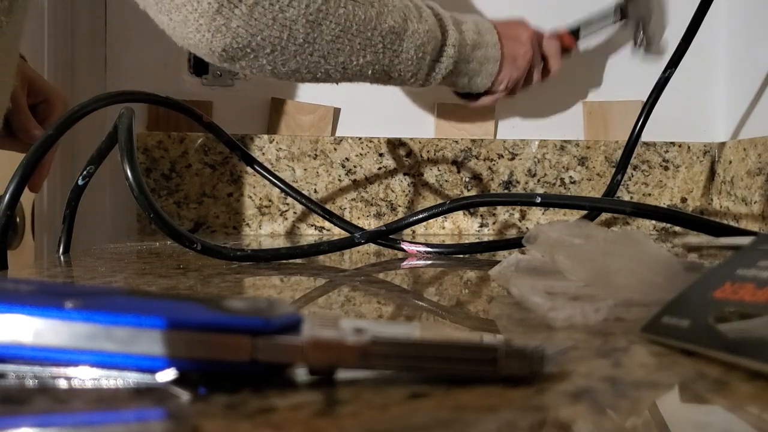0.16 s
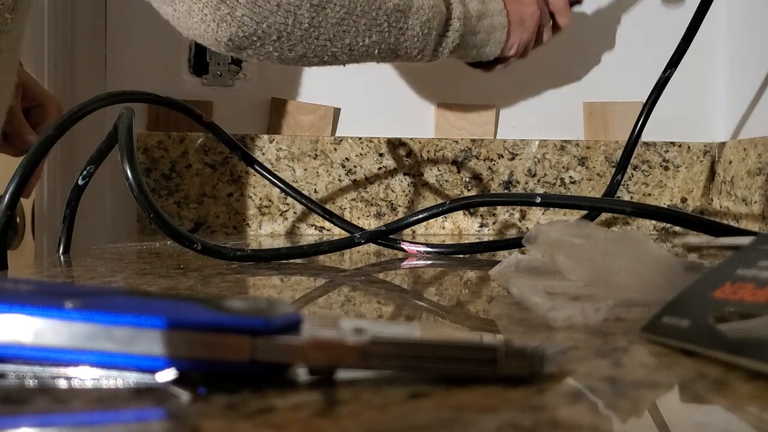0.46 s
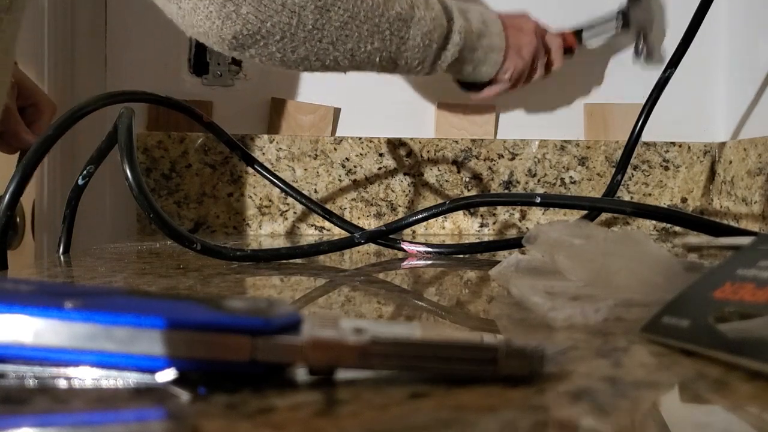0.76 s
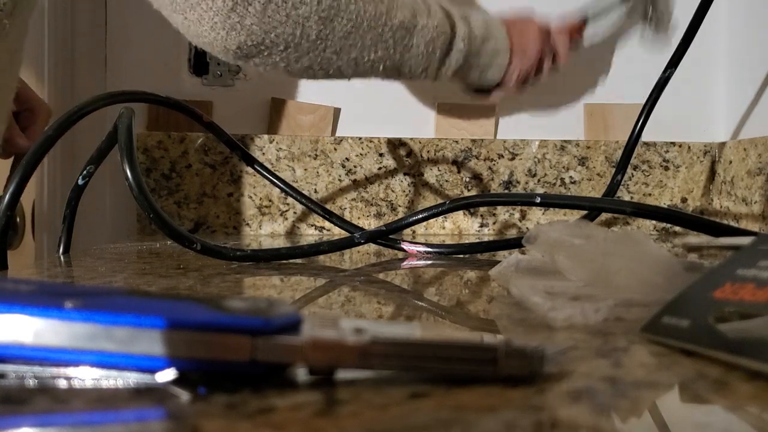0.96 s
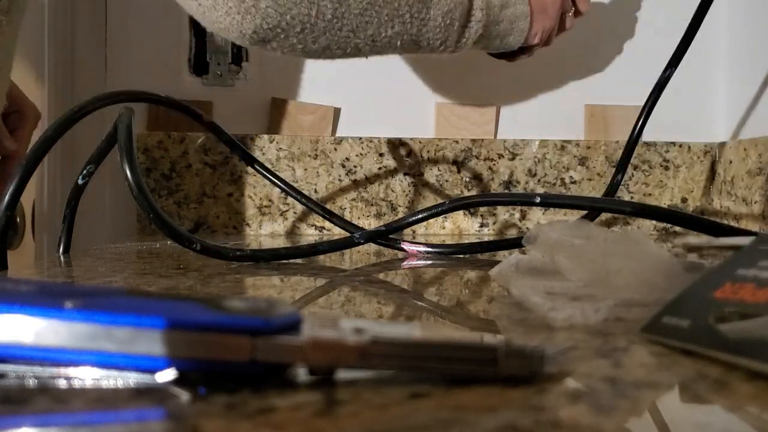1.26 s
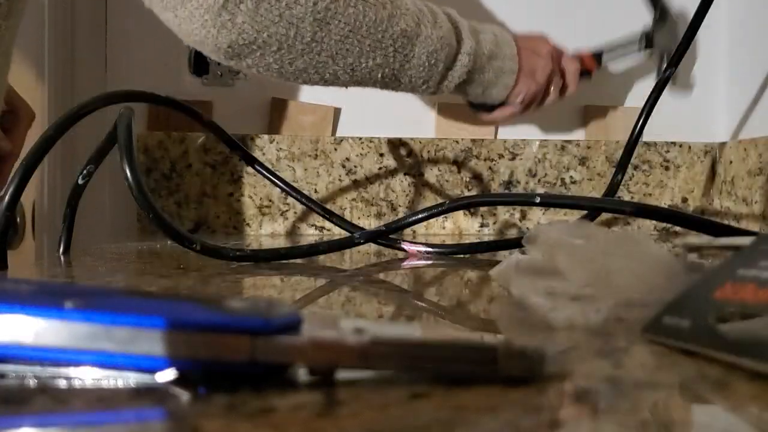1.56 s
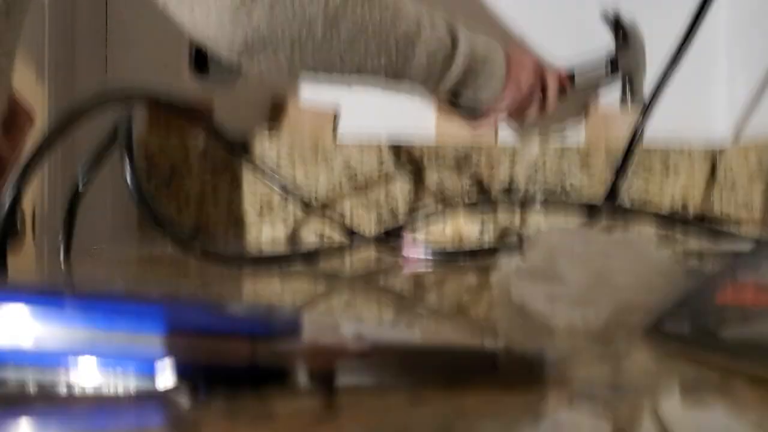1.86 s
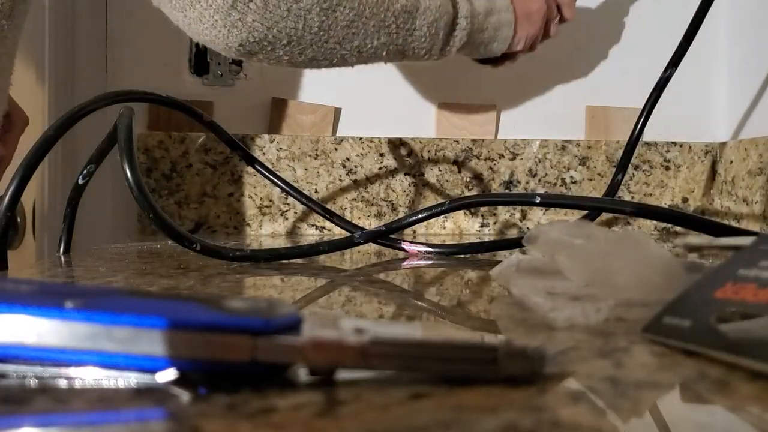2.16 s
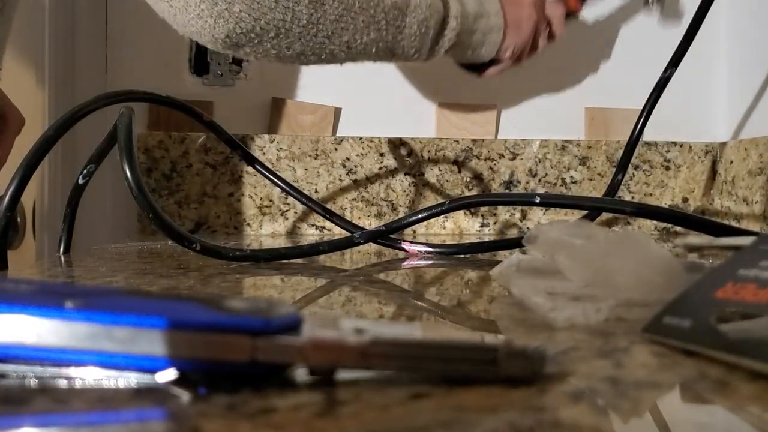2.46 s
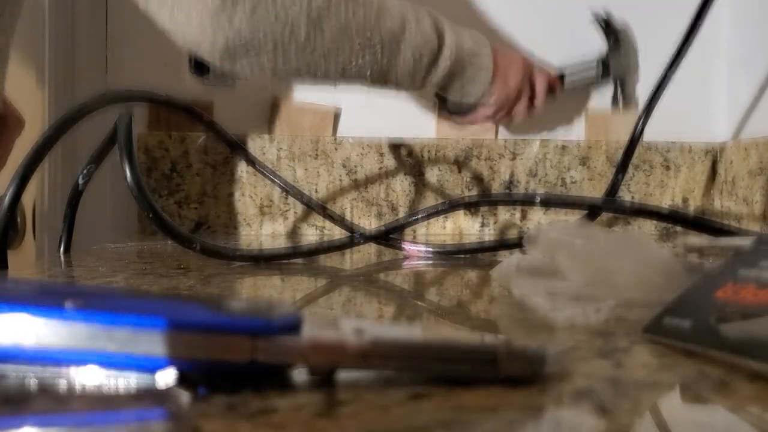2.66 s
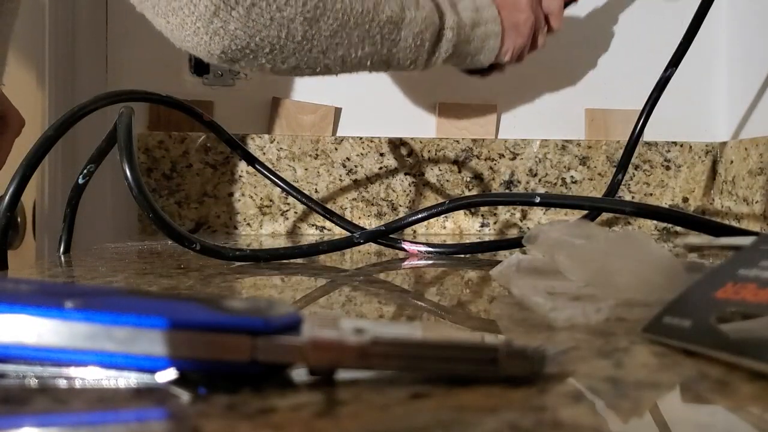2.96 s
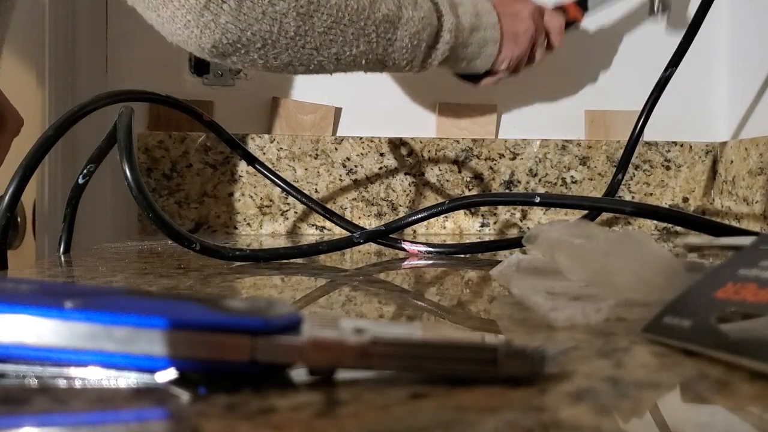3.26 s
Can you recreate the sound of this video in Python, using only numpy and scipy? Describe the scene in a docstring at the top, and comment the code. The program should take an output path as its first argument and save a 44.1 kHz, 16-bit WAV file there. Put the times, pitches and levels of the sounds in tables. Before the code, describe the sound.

Hammer blows crack sharply on a wooden wedge, about every 0.4 seconds, each with a short boom and bright room ring; close stereo phone microphone on a stone counter in a bare, hard room.

```python
"""Sharp hammer blows, each a crack with a brief boom and a ringing room: a claw hammer drives a wooden
wedge between a stone upstand and a wall, close to a phone lying on the stone counter of a bare, hard room.
Each blow comes faintly through the stone first (a short sine), then through the air as a noise burst.
Damped sines make the boom of wall panel and cabinet; fading noise makes the echoes. A light knock follows
one blow, and a faint room tone (steady noise) lies under it all. The right microphone is a little nearer."""
import sys
import numpy as np
from scipy import signal
from scipy.fft import rfft, irfft
from scipy.io import wavfile

SR = 44100
rng = np.random.default_rng(int(sys.argv[2]) if len(sys.argv) > 2 else 0)


def invert_db(x):
    """Field ratio 10**(x/20) for x, a level in decibels (scalar or array-like)."""
    u = np.asarray(x, float) / 20
    return 10 ** u


def put_to_file(sound):
    """Save the sound as 16-bit audio at rate SR, in the file named by the first command-line argument."""
    columns = np.atleast_2d(sound).T  # one column per channel
    safe = np.clip(columns, -1, 1)
    whole_steps = np.round(safe * 32767)
    wavfile.write(sys.argv[1], SR, whole_steps.astype(np.int16))


N = 149940  # samples, 3.4 s
LEAD_S, RING_S = .2, .75  # time computed ahead of the start; length of each blow
STONE_LEAD_S = .0018  # the sound in the stone arrives this much before the sound in the air
LEFT_LAG_S = .00016  # near sounds reach the left microphone later
ATTACK_S = 0.00011  # time constant of a quick rise


def read(table, hz):
    """Second column of a table, joined by straight lines on a log-frequency axis."""
    table = np.array(table, float)
    return np.interp(np.log(hz + 1), np.log(table[:, 0]), table[:, 1])


def decay(t, t60):
    """Exponential loss of energy: down by 60 dB after t60 seconds."""
    return np.exp(-np.log(1000) * t / t60)


def fade(t, t60):
    """A quick rise at time zero, then exponential decay; silent before."""
    t = np.maximum(t, 0)
    return (1 - np.exp(-t / ATTACK_S)) * decay(t, t60)


def coloured(colour, t, like):
    """Spectra of two noise channels, rms 1 together; like(hz) is their left-right correlation."""
    hz = np.fft.rfftfreq(len(t), 1 / SR)
    mid, side = rfft(rng.standard_normal((2, len(t)))) * invert_db(read(colour, hz))
    like = np.clip(like(hz), -1, 1)
    pair = np.sqrt(1 + like) * mid + np.sqrt(1 - like) * side * np.array([[1], [-1]])
    rms = np.sqrt(np.mean(irfft(pair, len(t)) ** 2))
    return pair / rms, hz


def late_left(x):
    """A near source: the same sound on both microphones, the left one later."""
    return np.array([np.roll(x, round(LEFT_LAG_S * SR)), x])


# hammer blows: t/s of the crack, level/dB, treble/dB above the knee, boom/dB (body and near walls),
# further level/dB above the top knee; the first falls before the start, so only its ring is heard
BLOWS = [(-.14, 4, 3.5, 4, -3), (0.2596, -1, 5.5, -2.5, -5.5), (0.6595, -0.5, 6, -3, -5),
         (1.0527, -0.5, 1, -4, -7), (1.4406, 0, -8, -1.5, 7), (1.9033, 0.5, -2.5, -2.5, 4),
         (2.318, -0.5, -2, -2, 9.5), (2.7117, 0.5, -2.5, -2.5, 5.5), (3.0994, 0.5, -1.5, -1.5, 2)]
OWN_SHARE = .35  # share of each blow's noise power that is its own, as the wedge sinks and the arm moves


def hammer_blows():
    """Every blow excites the same wedge, wall and room, with part of its echo pattern its own."""
    t = np.arange(int(RING_S * SR)) / SR
    lead = int(LEAD_S * SR)
    out = np.zeros((2, lead + N + len(t)))
    shared = np.array([*room(t), crack(t)])
    for s, db, treble_db, boom_db, top_db in BLOWS:
        own = np.array([*room(t), crack(t)])
        early, late, smack = np.sqrt(1 - OWN_SHARE) * shared + np.sqrt(OWN_SHARE) * own
        blow = smack + late + invert_db(boom_db) * (body(t) + early)
        blow = irfft(contact(t, treble_db, top_db) * rfft(blow), len(t))
        i = lead + int((s - STONE_LEAD_S) * SR)
        out[:, i:i + len(t)] += invert_db(db) * blow
    return out


def contact(t, treble_db, top_db):
    """One blow's force spectrum: a harder, shorter contact lifts the treble and the very top."""
    hz = np.fft.rfftfreq(len(t), 1 / SR)

    def shelf(knee_hz, order):
        return 1 - 1 / (1 + (hz / knee_hz) ** order)

    return invert_db(treble_db * shelf(4350, order=3) + top_db * shelf(10600, order=12))


# colour of the crack: f/Hz, level/dB (per Hz, relative)
CRACK = [(100, 5), (250, 2.5), (600, -3), (1200, -0.5), (2200, -15), (4400, -9.5), (5200, -27.5),
         (7000, -21.5), (8200, -28.5), (10000, -23), (16000, -61)]
CRACK_DB, CRACK_HOLD_S, CRACK_T60_S = -7, 0.0022, 0.013


def crack(t):
    """The direct smack through the air: a few ms of dense arrivals, held briefly and then fading fast."""
    pair, _ = coloured(CRACK, t, lambda hz: 1 + 0 * hz)
    noise = irfft(pair[0], len(t))
    u = t - STONE_LEAD_S
    envelope = np.where(u < CRACK_HOLD_S, fade(u, 1), decay(u - CRACK_HOLD_S, CRACK_T60_S))
    return late_left(invert_db(CRACK_DB) * noise * envelope)


# tones of wall panel, cabinet, wedge and hammer head: f/Hz, level/dB, time to fall 60 dB/s
BODY = [(46.8, -20.5, 0.57), (101, -23.5, 0.62), (114, -19, 0.44), (150.2, -19.5, 0.35),
        (185.8, -16.5, 0.35), (206.7, -17, 0.13), (235.4, -19, 0.37), (265.8, -19.5, .4),
        (324, -12, 0.0085), (368.4, -24.5, .3), (391.4, -20, 0.35), (347.6, -21.5, 0.17),
        (539.4, -25.5, 0.64), (647, -31.5, 0.25), (784, -21.5, 0.13), (884, -18, 0.14), (1049.5, -16, 0.13),
        (1114, -19.5, 0.19), (1764, -18, 0.11), (6770, -26, 0.026)]
STONE_DB, STONE_HZ = -18.5, 970
MODE_SCATTER_DB = 2.  # each blow lands a little differently


def body(t):
    """A dull forerunner through the stone, then damped modes, pushed away from the listener first."""
    u = t - STONE_LEAD_S
    stone = invert_db(STONE_DB) * np.sin(2 * np.pi * STONE_HZ * t) * fade(t, 4 * STONE_LEAD_S)
    scatter_db = MODE_SCATTER_DB * rng.standard_normal(len(BODY))
    modes = 0
    for (hz, db, t60), own_db in zip(BODY, scatter_db):
        modes = modes + invert_db(db + own_db) * np.sin(2 * np.pi * hz * u) * fade(u, t60)
    return late_left(-stone - modes)  # minus: pushed away first


# colour of the near walls' echo: f/Hz, level/dB (per Hz, relative)
EARLY = [(60, -39), (150, -11.5), (300, -5), (600, -8.5), (1000, -14.5), (2000, -16), (3000, -14),
         (4500, -25), (8000, -41), (16000, -46)]
EARLY_DB, EARLY_T60_S = -11.5, 0.13
# colour of the far room's echo: f/Hz, level/dB (per Hz, relative)
LATE = [(35, -25), (76, -11), (108, -8.5), (200, -9.5), (380, -8.5), (557, -8.5), (820, -14.5),
        (1480, -18.5), (3270, -20), (4400, -25.5), (5200, -32), (7000, -35.5), (8000, -43), (10000, -41),
        (12000, -54), (16000, -56)]
LATE_DB, LATE_RISE_S = -18.5, .02
# how long the far room rings: f/Hz, time to fall 60 dB/s
LATE_T60 = [(40, 1), (110, 0.65), (200, 0.84), (330, 0.82), (520, 0.89), (900, 1), (1940, 1.0),
            (3500, 0.92), (6000, .8), (9000, 0.53), (13500, 0.51)]
# how alike the room sounds left and right, also for the room tone: f/Hz, correlation (-1 to 1)
LIKENESS = [(50, .9), (150, 0.77), (300, 0.8), (600, 0.26), (1200, 0.0094), (2500, 0.27), (5000, -0.2),
            (12000, 0.51)]


def likeness(hz):
    """Left-right correlation of sound that comes from all around the room."""
    return read(LIKENESS, hz)


def room(t):
    """Near walls answer at once and die fast; the far room builds up and fades band by band."""
    u = t - STONE_LEAD_S
    pair, _ = coloured(EARLY, t, likeness)
    early = invert_db(EARLY_DB) * irfft(pair, len(t)) * fade(u, EARLY_T60_S)
    pair, hz = coloured(LATE, t, likeness)
    late = 0
    for centre in 30 * 2 ** np.arange(0, 9.6, .5):  # overlapping bands, half an octave apart
        band = np.clip(1 - 2 * abs(np.log2((hz + 1) / centre)), 0, 1)
        late = late + irfft(pair * band, len(t)) * fade(u, read(LATE_T60, centre))
    build_up = 1 - np.exp(-np.maximum(u, 0) / LATE_RISE_S)
    return early, invert_db(LATE_DB) * late * build_up


# two tones of a light knock after one blow: t/s, level/dB, f/Hz, time to fall 60 dB/s
KNOCKS = [(1.5268, -11.5, 750, .018), (1.5272, -18, 1950, .02)]


def light_knock(out):
    """Adds the knock to the blows: two damped sines that start almost together."""
    t = np.arange(int(RING_S * SR)) / SR
    for s, db, hz, t60 in KNOCKS:
        i = int(LEAD_S * SR) + int(s * SR)
        out[:, i:i + len(t)] += invert_db(db) * late_left(np.sin(2 * np.pi * hz * t) * fade(t, t60))
    return out


# colour of the room tone: f/Hz, level/dB (per Hz, relative)
FLOOR = [(25, -45), (45, -0.5), (100, -14), (250, 2), (500, -3), (1000, -2), (3000, -18), (8000, -63),
         (16000, -48)]
FLOOR_DB = -43


def room_tone():
    """Faint steady noise, as wide as the room's echoes."""
    pair, _ = coloured(FLOOR, np.arange(N), likeness)
    return invert_db(FLOOR_DB) * irfft(pair, N)


def scene():
    """Blows and knock with their lowest bass cut, over the room tone."""
    out = light_knock(hammer_blows())
    low_cut = signal.butter(3, 81, "high", fs=SR, output="sos")  # Hz
    lead = int(LEAD_S * SR)
    return signal.sosfilt(low_cut, out)[:, lead:lead + N] + room_tone()


# how the two microphones differ: f/Hz, left minus right level/dB
BALANCE_DB = [(40, -12), (80, -1.2), (4000, -0.2), (8000, -2), (12000, -4.5)]
CLIP_TOP = 1.3  # amplitude that the rounded peaks never pass


def microphones(dry):
    """Tilts the balance by frequency, half on each side, then rounds the peaks and cuts the top."""
    lean = read(BALANCE_DB, np.fft.rfftfreq(N, 1 / SR)) / 2
    x = irfft(rfft(dry) * invert_db(np.array([lean, -lean])), N)
    rounded = CLIP_TOP * np.tanh(x / CLIP_TOP)
    top_cut = signal.ellip(6, .2, 30, 15800, fs=SR, output="sos")  # dB ripple, dB stop, Hz
    return signal.sosfilt(top_cut, rounded)


def band_limit(x):
    """A steep low-pass at the top of the band."""
    return signal.sosfilt(signal.butter(12, 16710, fs=SR, output="sos"), x)


def record(dry):
    """The finished mix as the two microphones pass it on."""
    mix = microphones(dry)
    return band_limit(mix)


dry = scene()
out = record(dry)
put_to_file(out)
```